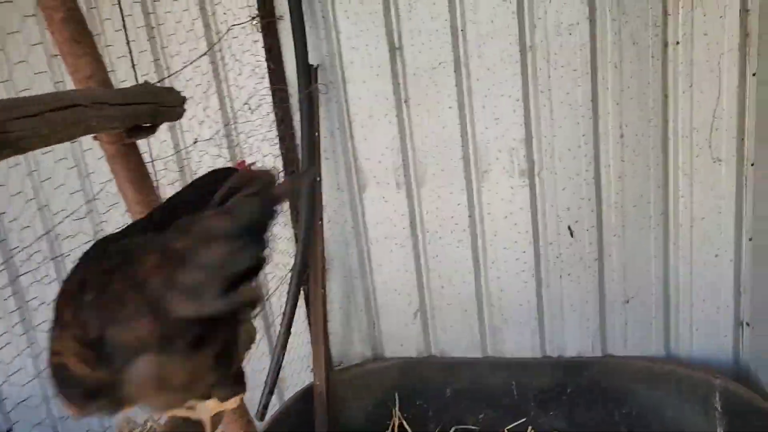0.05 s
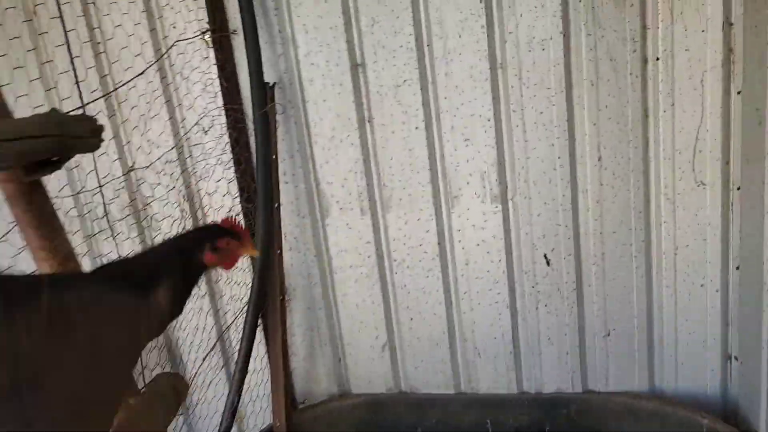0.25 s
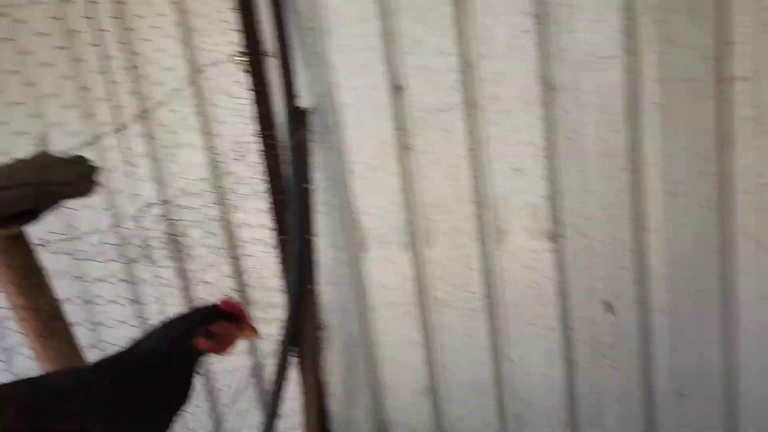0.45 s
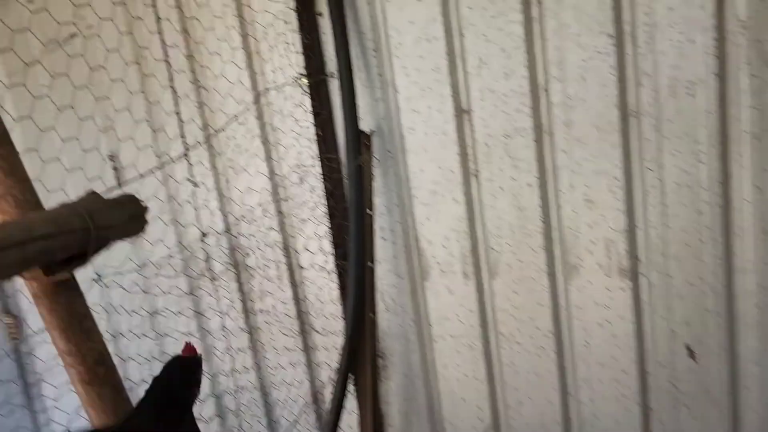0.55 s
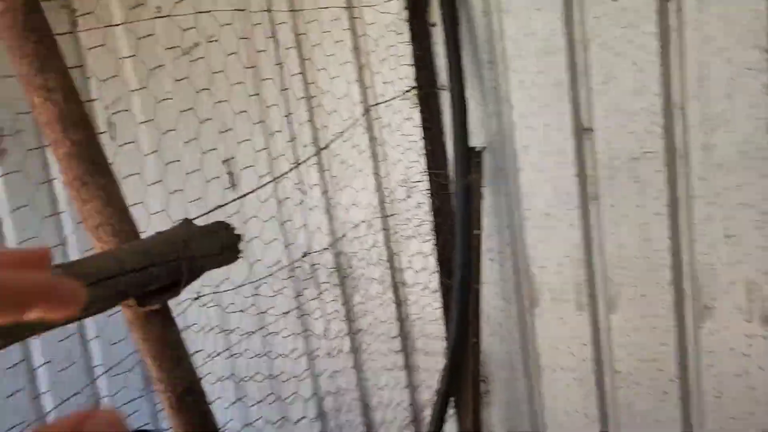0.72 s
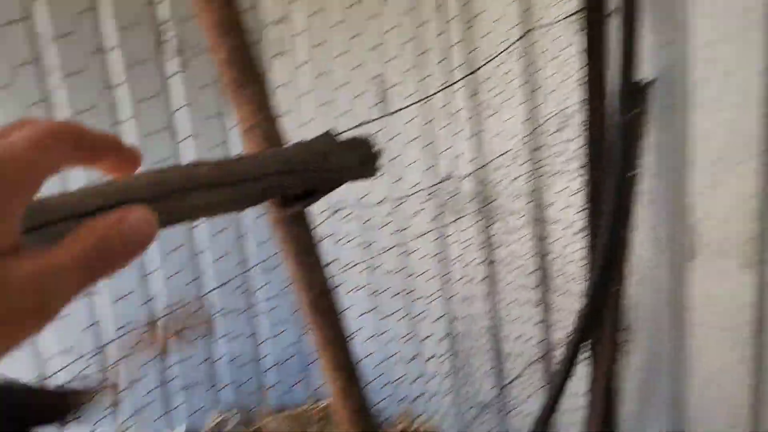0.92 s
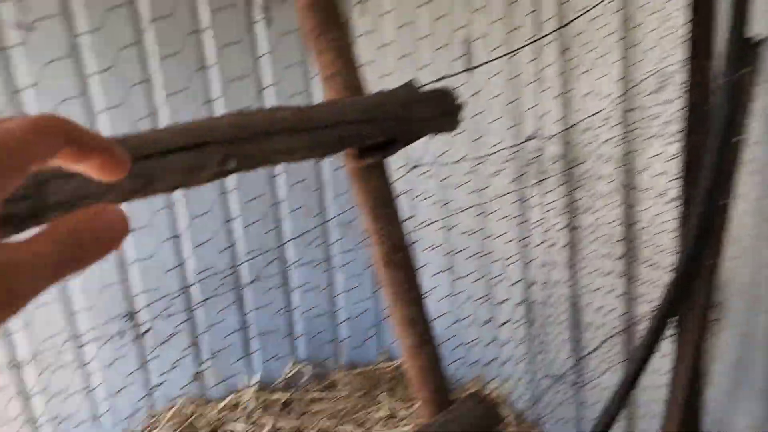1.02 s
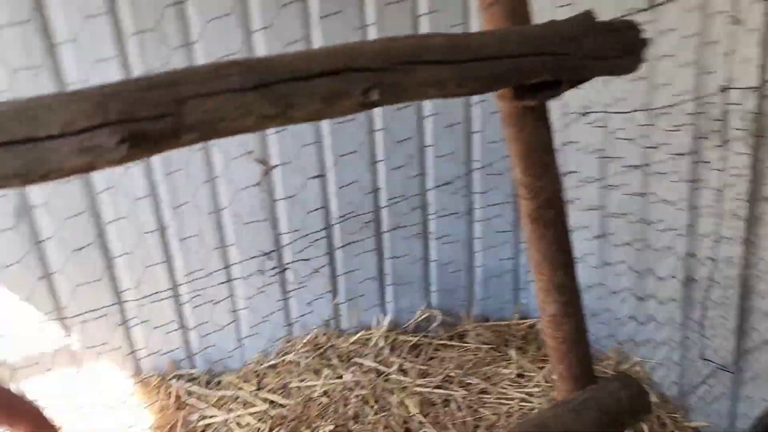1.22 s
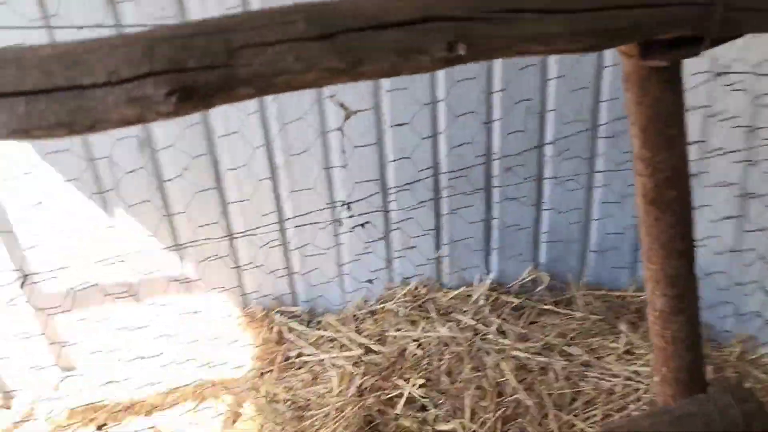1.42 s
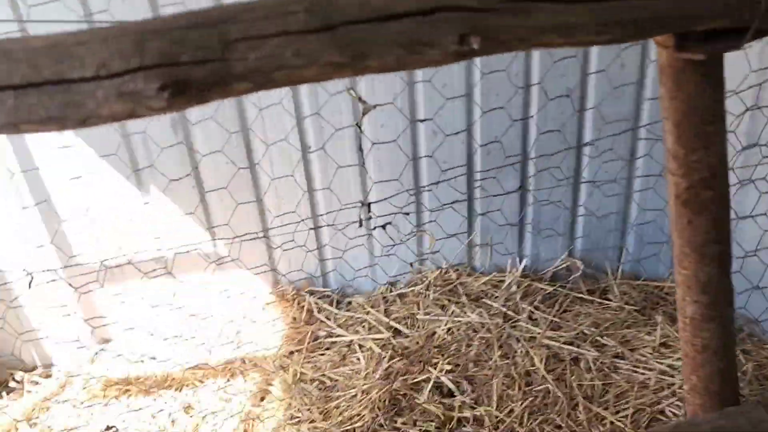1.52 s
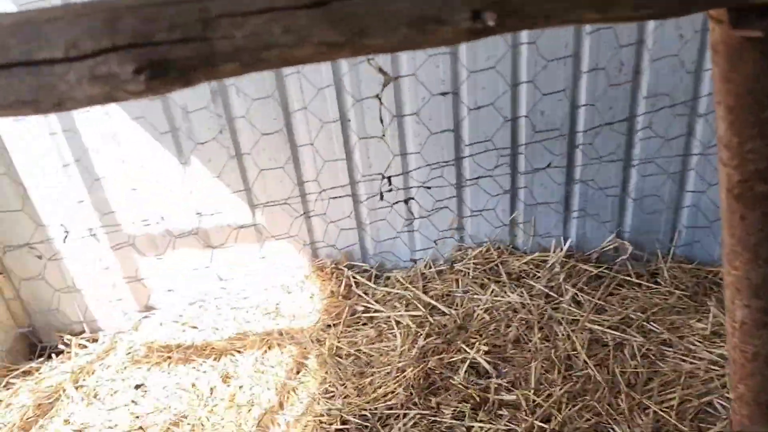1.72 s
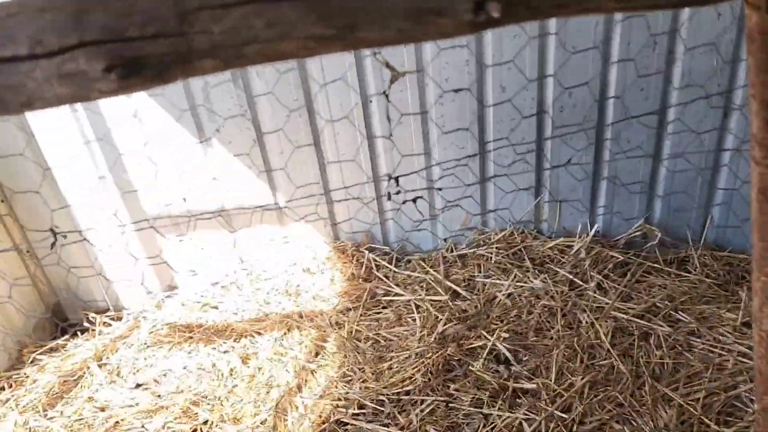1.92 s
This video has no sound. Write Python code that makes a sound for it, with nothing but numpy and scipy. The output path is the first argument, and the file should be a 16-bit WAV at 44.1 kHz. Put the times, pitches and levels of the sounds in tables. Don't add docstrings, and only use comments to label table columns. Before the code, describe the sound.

Chicken clucking and scrambling off a perch: rough clucks first, a dense flurry of wing cracks and hollow knocks near one second, then fading feather swishes and straw, heard close in stereo with short tinny reflections.

```python
import sys
import numpy as np
from scipy import signal
from scipy.fft import rfft, irfft
from scipy.io import wavfile
from scipy.ndimage import uniform_filter1d

SR = 44100
rng = np.random.default_rng(int(sys.argv[2]) if len(sys.argv) > 2 else 0)


def elevation(decibels):
    levels = np.asarray(decibels, float)
    return 10 ** (levels / 20)


def int16_out(signal):
    q = np.round(np.clip(np.atleast_2d(signal).T, -1, 1) * 32767)
    wavfile.write(sys.argv[1], SR, q.astype(np.int16))


N = 85995
T = np.arange(N) / SR
F = np.arange(N // 2 + 1) * SR / N + 1e-3

# (time [s], rustle [dB], buffeting [dB], tub rumble [dB])
STRUGGLE = [(0.0, -50.5, -60, -52), (0.048, -48, -48.5, -53.5), (0.19, -48, -53, -59.5),
            (0.21, -34, -35.5, -49), (0.336, -43.5, -36, -60), (0.406, -39.5, -33.5, -47.5),
            (0.51, -46, -32, -44), (.64, -48, -37, -53), (0.738, -42.5, -39, -46.5),
            (0.852, -35.5, -24, -41.5), (0.922, -36, -32, -35.5), (0.96, -31, -19.5, -47),
            (0.988, -38, -34, -39), (1.302, -40.5, -31.5, -41.5), (1.45, -43.5, -27.5, -39.5),
            (1.542, -44, -35.5, -43), (1.748, -49, -33, -49), (1.95, -51, -41, -48.5)]


def unit(x):
    return x / np.sqrt(np.mean(x ** 2))


def shape(points, hz):
    p = np.array(points, float)
    return elevation(np.interp(np.log(hz), np.log(np.maximum(p[:, 0], 1)), p[:, 1]))


def band(x, hz, width):
    return signal.lfilter(*signal.iirpeak(min(hz, .4 * SR), hz / width, fs=SR), x)


def walk(rate, count=N):
    k = max(int(SR / rate), 1)
    steps = np.repeat(rng.standard_normal(count // k + 1), k)
    return 1.3 * uniform_filter1d(uniform_filter1d(steps, k), k)[:count]


def add(out, t, x):
    i = int(round(t * SR))
    x = x[max(-i, 0):N - i]
    start = max(i, 0)
    out[start:start + len(x)] += x


def struggle_level(column):
    table = np.array(STRUGGLE)
    return np.interp(T, table[:, 0], table[:, column])


def flicker(points, lo, count, patchy_db, rate):
    out = 0
    for hz in lo * 2 ** (np.arange(count) / 2):
        lobe = np.clip(1 - 2 * np.abs(np.log2(F / hz)), 0, 1) ** .5
        noise = irfft(rfft(rng.standard_normal(N)) * lobe * shape(points, F), N)
        out = out + elevation(patchy_db * walk(rate)) * noise
    return unit(out)


def clucks():
    # (start [s], length [s], pitch [Hz], roughness [0-1])
    calls = [(-.005, .06, 486, .08), (.04, .12, 484, .08), (.206, .12, 490, .36), (.272, .056, 512, .55),
             (.304, .058, 498, .3), (.457, .048, 478, .45), (.523, .044, 581, .3), (.744, .042, 466, .1),
             (.869, .072, 453, .2), (.44, .062, 540, .1), (.502, .02, 520, .25)]
    # (centre [Hz], lift [dB], cluck level [dB])
    beaks = [(970, 19, -39), (1700, 5.5, -45.5), (1000, 9, -29.5), (1337, 15, -25.5), (500, 9, -34.5),
             (1282, 8, -28), (1750, 9, -15.5), (454, 4.5, -24.5), (1290, 13, -21.5), (2130, 18, -46),
             (1550, 25, -30.5)]
    contours = [(.65, 0), (.5, .01), (.7, .04), (.6, 0), (.25, 0), (.4, 0), (.45, -.05), (.6, .035),
                (.45, -.035), (.35, -.04), (.6, .2)]
    # (frequency [Hz], gain [dB])
    throat = [(300, -3), (600, -1), (1200, -0.5), (2000, -1.5), (2600, -12), (3200, -15), (4500, -31.5)]
    beak_width, arch, jitter = .2, .025, .03
    flatness = .6
    rasp_db, rasp_duty = 4.5, 0.1
    out, n = np.zeros(N), 6000
    f = np.arange(n // 2 + 1) * SR / n + 1
    for (t, length, hz, rough), (beak_hz, lift_db, db), (rise, glide) in zip(calls, beaks, contours):
        def tract(freq):
            lift = lift_db * np.exp(-(np.log(freq / beak_hz) / beak_width) ** 2)
            return shape(throat, freq) * elevation(lift)

        u = np.clip(np.arange(n) / (length * SR), 0, 1)
        bend = -arch * (2 * u - 1) ** 2 + glide * (u - .5)
        pitch = hz * (1 + bend + jitter * rough * walk(288, count=n))
        phase = 2 * np.pi * np.cumsum(pitch) / SR

        voice = 0
        for k in range(1, 9):
            angle = k * phase + k * k
            steady = (1 - rough / 2 + rough * walk(401, count=n)) * np.sin(angle)
            flutter = rough * walk(400, count=n) * np.cos(angle)
            voice = voice + tract(k * hz) * (steady + flutter)

        puffs = rng.standard_normal(n) * np.exp(-(phase / (2 * np.pi) % 1) / rasp_duty)
        rasp = irfft(rfft(puffs) * tract(f) * np.minimum(f / 400, 1) ** 2, n)
        voice = unit(voice) + rough * elevation(rasp_db) * unit(rasp)

        warped = u ** (np.log(.5) / np.log(rise))
        swell = np.abs(np.sin(np.pi * warped)) ** flatness * (u < 1)
        add(out, t, elevation(db) * voice * swell)
    return out


def rustle():
    # (frequency [Hz], gain [dB])
    straw = [(290, -14), (500, -8), (893, -2.5), (2260, -5), (5880, -14), (8210, -13), (9630, -18),
             (11800, -16.5), (16000, -16.5)]
    level_db, snap_db, snaps_per_s = -3, -9.5, 1200
    hits = rng.random(N) < snaps_per_s / SR
    strength = elevation(np.minimum(3 * rng.exponential(size=N), 12))
    snaps = hits * strength * np.sign(rng.standard_normal(N))
    snaps = unit(irfft(rfft(snaps) * shape(straw, F), N))
    hiss = flicker(straw, 478, count=11, patchy_db=3, rate=31)
    return unit(hiss + elevation(snap_db) * snaps) * elevation(level_db + struggle_level(1))


def buffet():
    # (frequency [Hz], gain [dB])
    gust_tone = [(12, -32), (20, -14), (43, 0.5), (123, 0), (168, -7), (334, 10), (362, -11), (653, -28.5),
                 (1000, -52), (1300, -61), (2200, -120)]
    gusts = flicker(gust_tone, 24.1, count=6, patchy_db=1.5, rate=14.38)
    return gusts * elevation(-0.5 + struggle_level(2))


def tub():
    # (frequency [Hz], gain [dB])
    tub_tone = [(140, -4), (200, 2.5), (360, 0), (500, -3), (650, -10), (1000, -34)]
    rumble = flicker(tub_tone, 188.4, count=5, patchy_db=2.5, rate=20)
    return rumble * elevation(4 + struggle_level(3))


def feathers(hz, count):
    shared, ragged_db = 0.22, 2.5
    noise = rng.standard_normal((3, count))
    noise = np.sqrt(shared) * noise[0] + np.sqrt(1 - shared) * noise[1:]
    colour = unit(band(noise, hz, 0.92 * hz)) + 0.11 * unit(band(noise, 7400, 18000))
    return colour * elevation(ragged_db * walk(300, count=count))


def slaps():
    # (time [s], crack [dB], crack centre [Hz], tail t60 [s], thud [dB])
    hits = [(.128, -33.5, 4460, 0.15, -69), (0.1781, -27, 3220, 0.98, -52), (0.2085, -20, 5100, 1, -42.5),
            (0.3787, -21, 5750, 0.067, -43), (0.5175, -14, 3000, 0.2, -44), (0.72, -30.5, 4450, 0.35, -69),
            (0.737, -27, 4000, 0.14, -44), (0.791, -18, 3700, 0.42, -24.5), (0.806, -9, 4150, 0.087, -26.5),
            (0.871, -13, 7260, 0.37, -26), (.902, -10.5, 3060, 0.089, -21), (0.9501, -5, 7100, 0.14, -17),
            (.959, -7, 3140, 0.16, -20.5), (1.0248, -19, 4940, 0.058, -33),
            (1.0604, -21.5, 5400, 0.2, -29.5), (1.065, -23.5, 4700, 0.077, -26.5),
            (1.1188, -29, 4140, 0.051, -20), (1.128, -42, 3000, .06, -20.5),
            (1.293, -22.5, 8400, 0.089, -41), (1.33, -26.5, 2500, 0.13, -38), (1.475, -41, 8000, 0.55, -42)]
    # (frequency [Hz], gain [dB])
    thud_modes = [(65, -6), (105, -6), (300, -3.5), (360, -4), (450, -3.5), (530, -5.5), (640, -9)]
    crack_t60_s, crack_hold_s, tail_db = 0.023, 0.0013, -9
    knock_t60_s, thud_t60_s = .015, 0.1
    push_s, push_db = .007, -1
    near, tails, s = np.zeros(N), np.zeros((2, N)), T[:12000]

    def fade(t60, hold=0):
        attack = np.minimum(s / 0.00084, 1)
        return attack * elevation(-60 * np.maximum(s - hold, 0) / t60)

    p = s / push_s
    push = -elevation(push_db) * p * (1 - p) * np.exp(-2 * p) * 2 * np.pi
    for t, db, hz, t60, thud_db in hits:
        noise = rng.standard_normal(len(s))
        crack = band(noise, hz, 0.46 * hz) * 3
        crack = crack + (hz / 7500) ** 2 * band(noise, 6200, 17400)
        crack = crack * fade(crack_t60_s, crack_hold_s)
        add(near, t, elevation(db) * crack / np.max(np.abs(crack)))

        for port, tail in zip(tails, feathers(hz, count=len(s))):
            add(port, t, 0.43 * elevation(db + tail_db) * tail * fade(t60))

        knock = rng.standard_normal(len(s)) * fade(knock_t60_s)
        thud = 0
        for mode_hz, gain_db in thud_modes:
            tuned_hz = mode_hz * (1 + 0.078 * rng.standard_normal())
            thud = thud + elevation(gain_db) * band(knock, tuned_hz, 1.96 / thud_t60_s)
        add(near, t, elevation(thud_db) * (thud / np.max(np.abs(thud)) * 2 + push))
    return near, tails


def sweeps():
    # (centre time [s], length [s], level [dB], centre frequency [Hz])
    strokes = [(0.237, .13, -60, 4900), (0.421, 0.064, -41.5, 8800), (0.542, 0.05, -32.5, 2730),
               (0.833, 0.055, -36.5, 4230), (0.982, 0.051, -31.5, 4800), (1.08, .05, -39.5, 5870),
               (1.284, 0.093, -41, 8800), (1.35, 0.085, -42, 2350), (1.2, 0.063, -46.5, 2570),
               (1.607, 0.065, -45, 2930), (1.498, 0.088, -45, 8900), (1.722, .1, -49, 9100)]
    out, s = np.zeros((2, N)), T[:9000]
    for t, length, db, hz in strokes:
        swell = np.sin(np.pi * np.minimum(s / length, 1)) ** 2
        for port, x in zip(out, feathers(hz, count=len(s))):
            add(port, t - length / 2, elevation(db) * x * swell)
    return out


def tin_walls(near):
    pen_t60_s = 0.13
    s = T[400:12000]
    echoes = rng.standard_normal((2, len(s))) * elevation(-60 * s / pen_t60_s)
    echoes = np.pad(band(echoes, 1190, 4400), ((0, 0), (200, 0)))
    echoes = echoes / np.sqrt(np.sum(echoes ** 2) / 2)
    return signal.fftconvolve(near[None], echoes, axes=1)[:, :N]


def scene():
    right_lag_s, voice_late_db, voice_bounce_db = 0.0003805, -3, -3.5
    walls_db, straw_db, side_buffet_db = -16, 4, -23.5
    knocks, tails = slaps()
    voice = clucks()
    near = knocks + rustle() + tub()
    delay = np.exp(-2j * np.pi * F * right_lag_s)
    late = irfft(rfft(near + elevation(voice_late_db) * voice) * delay, N)
    late = late + elevation(voice_bounce_db) * clucks()
    near = near + voice
    walls = tin_walls(near)
    around = np.array([rustle(), rustle()])
    air = buffet() + elevation(side_buffet_db) * buffet() * np.array([[1], [-1]])
    direct = np.array([near, late])
    return direct + elevation(walls_db) * walls + elevation(straw_db) * around + air + tails + sweeps()


def roll_off(x):
    return signal.sosfilt(signal.butter(12, 16970, fs=SR, output="sos"), x)


def record(dry):
    # (centre [Hz], width [Hz], lift [dB])
    ports = [
        [(7540, 2630, 6.5), (410, 210, 0.5)],
        [(4380, 1100, 7.5), (11830, 505, 14)],
    ]
    heard = []
    for channel, resonances in zip(dry, ports):
        ring = sum((elevation(db) - 1) * band(channel, hz, width) for hz, width, db in resonances)
        heard.append(channel + ring)
    clipped = np.clip(np.array(heard), -.98, .98)
    top_cut = signal.cheby1(10, .5, 15900, fs=SR, output="sos")
    mix = signal.sosfilt(top_cut, clipped)
    return roll_off(mix)


dry = scene()
out = record(dry)
int16_out(out)
```